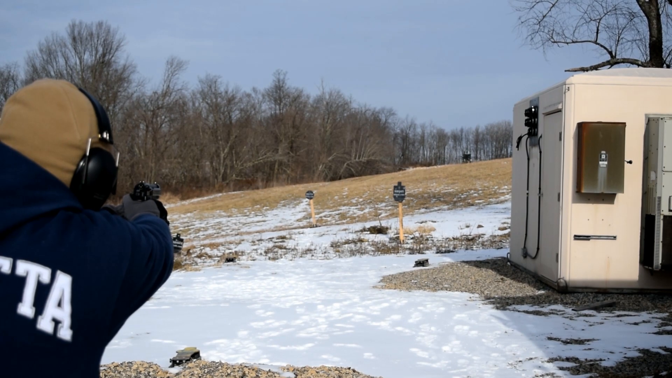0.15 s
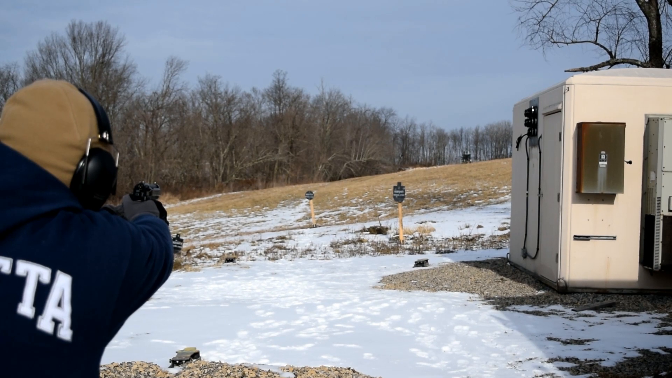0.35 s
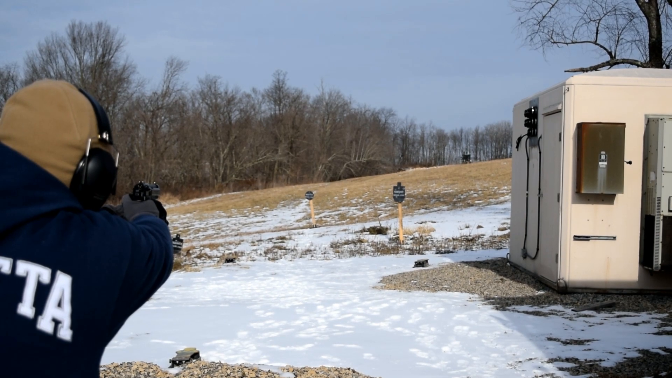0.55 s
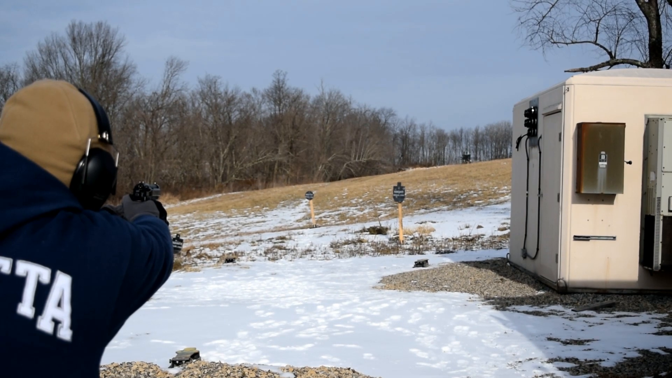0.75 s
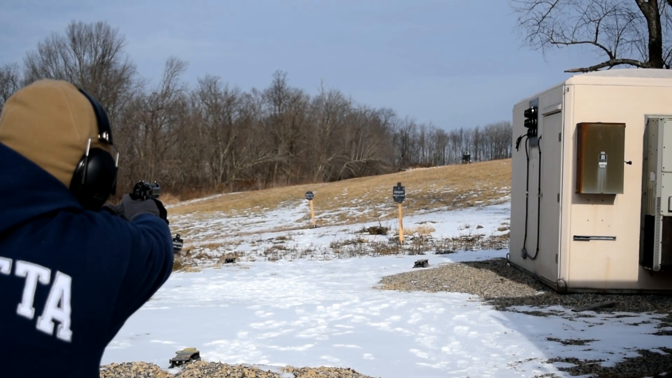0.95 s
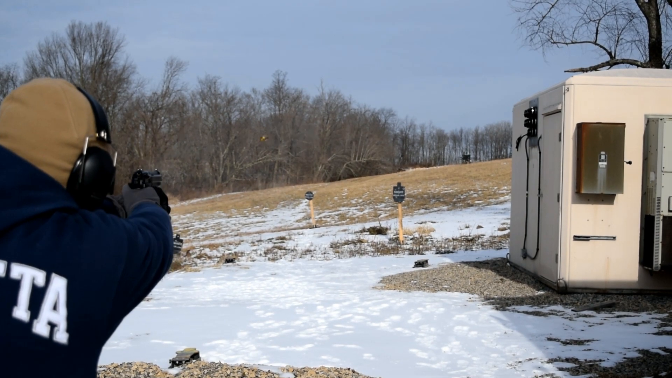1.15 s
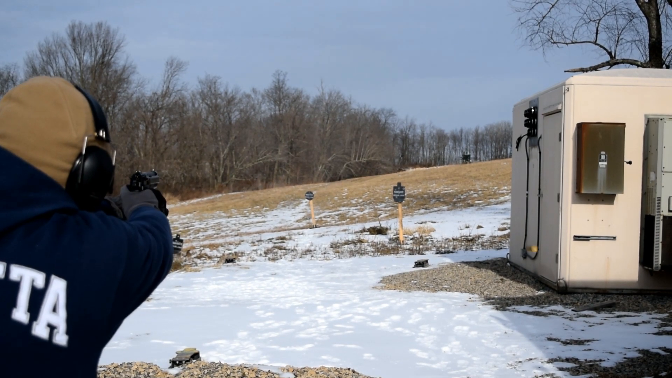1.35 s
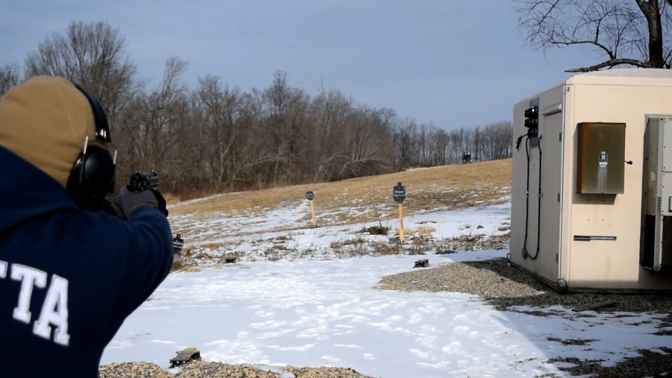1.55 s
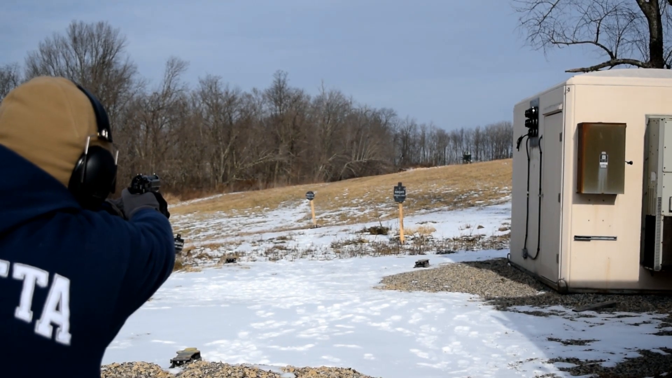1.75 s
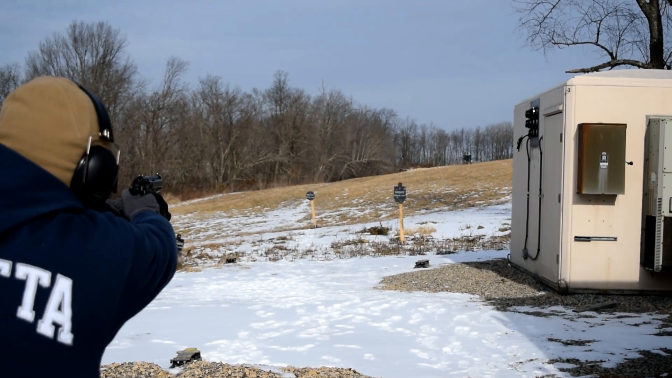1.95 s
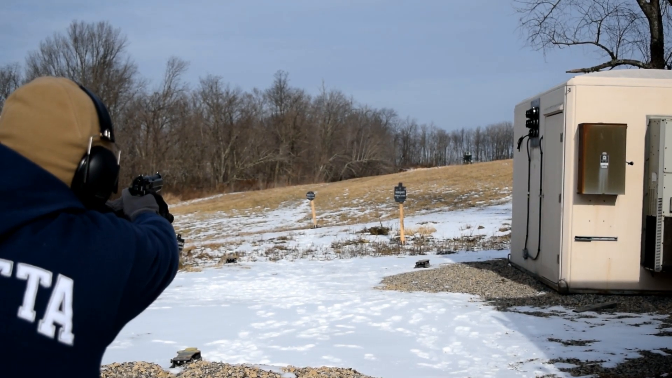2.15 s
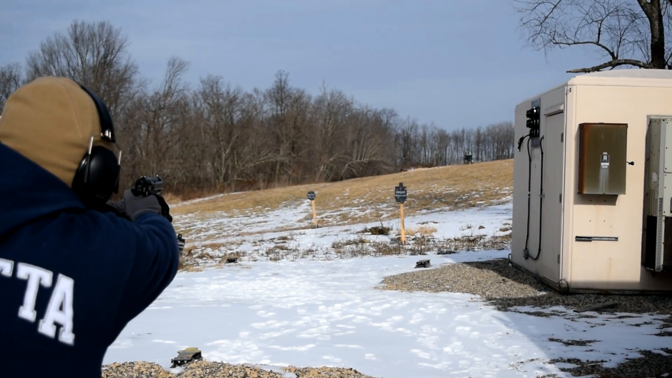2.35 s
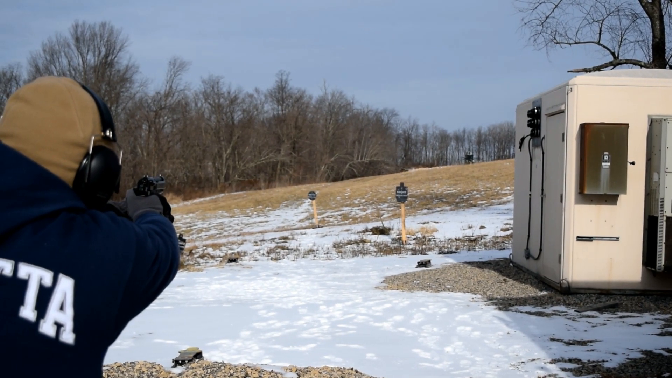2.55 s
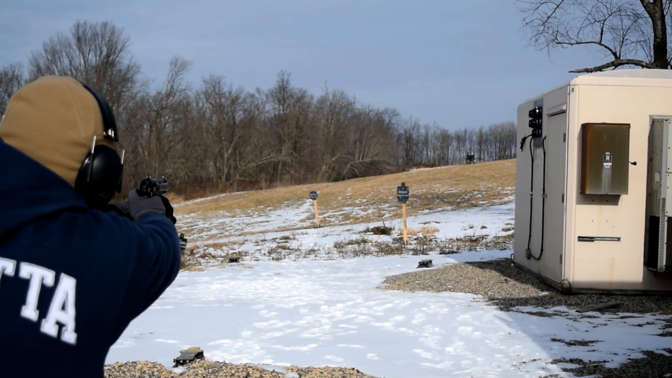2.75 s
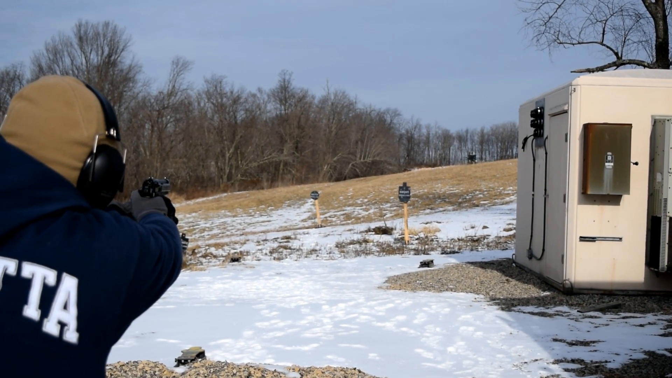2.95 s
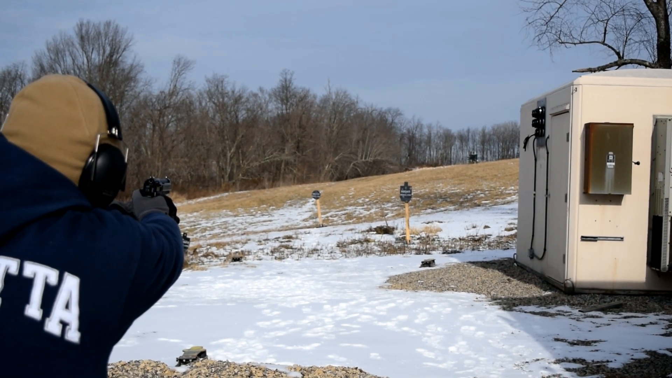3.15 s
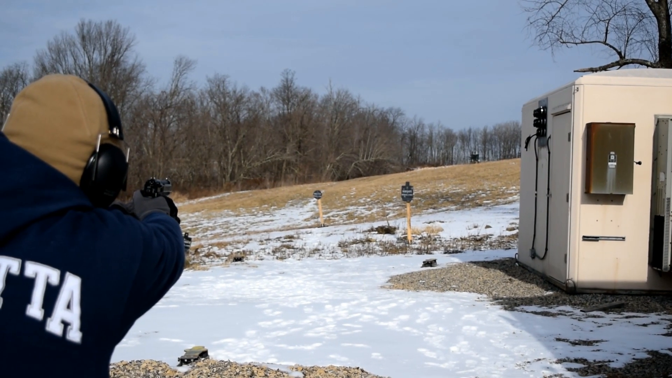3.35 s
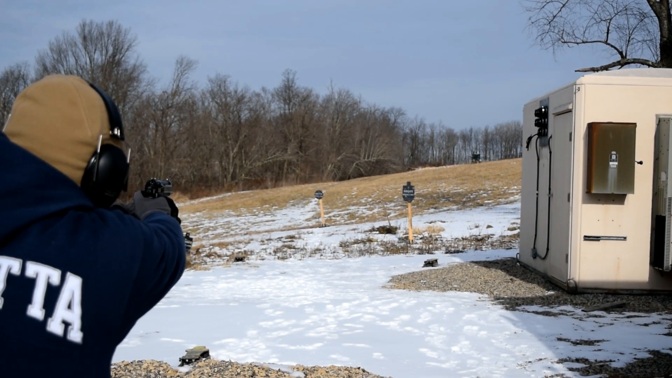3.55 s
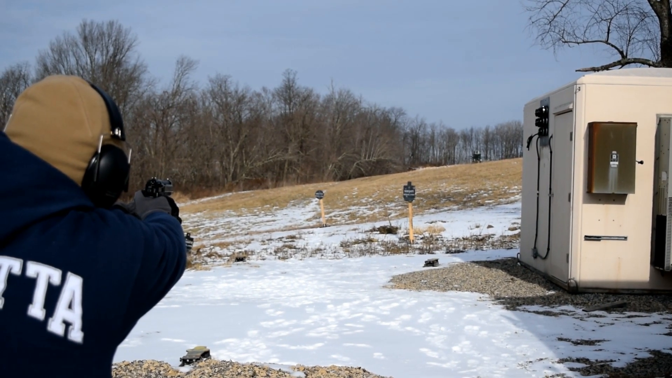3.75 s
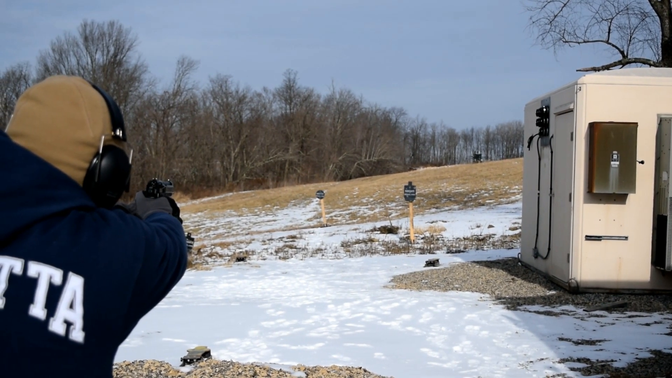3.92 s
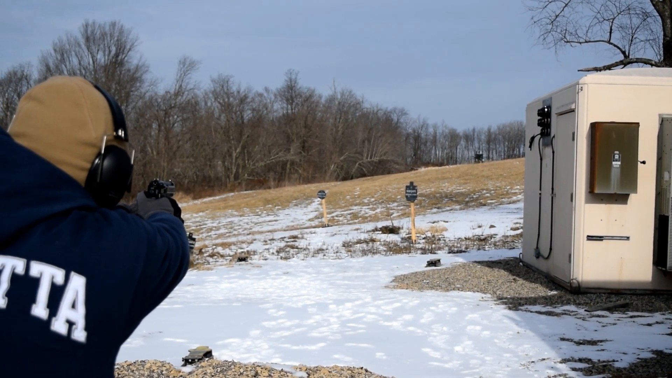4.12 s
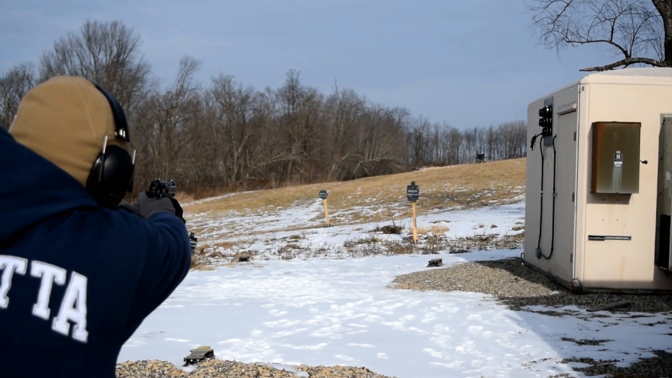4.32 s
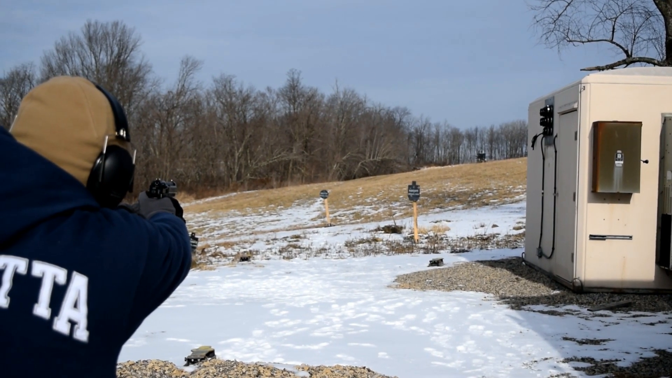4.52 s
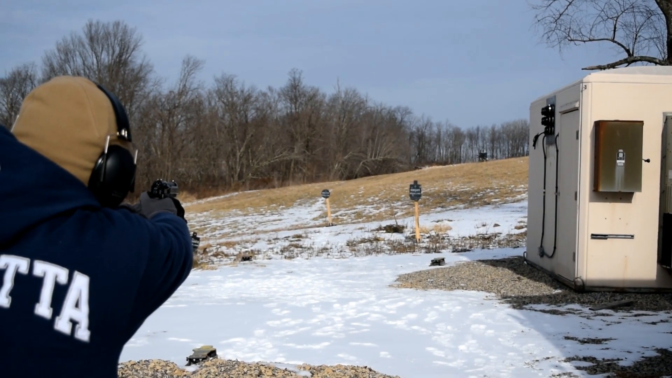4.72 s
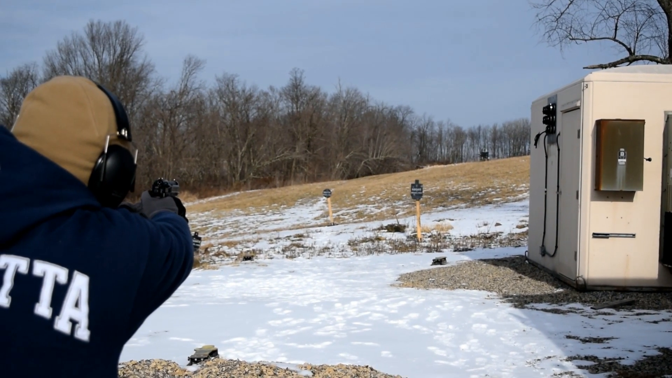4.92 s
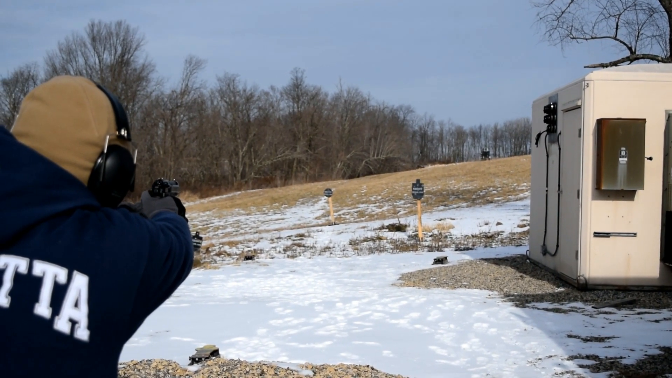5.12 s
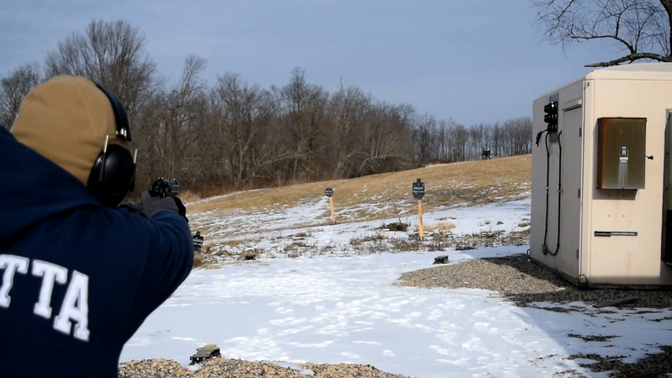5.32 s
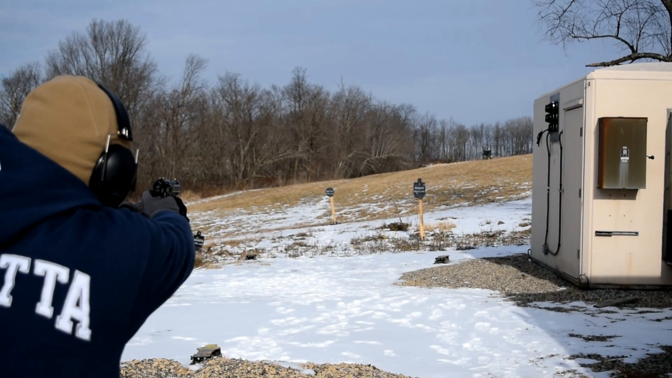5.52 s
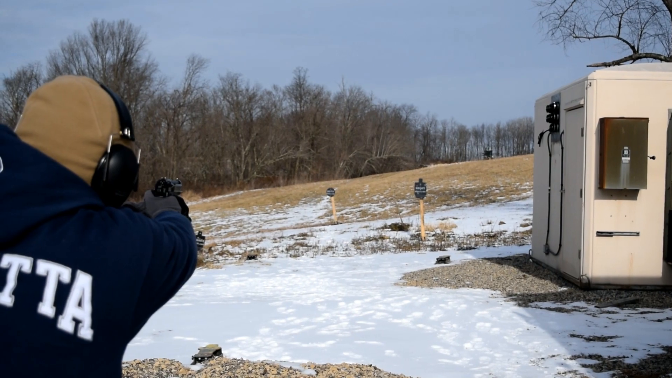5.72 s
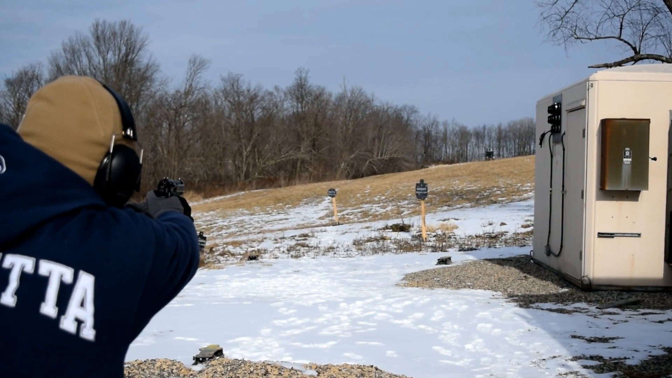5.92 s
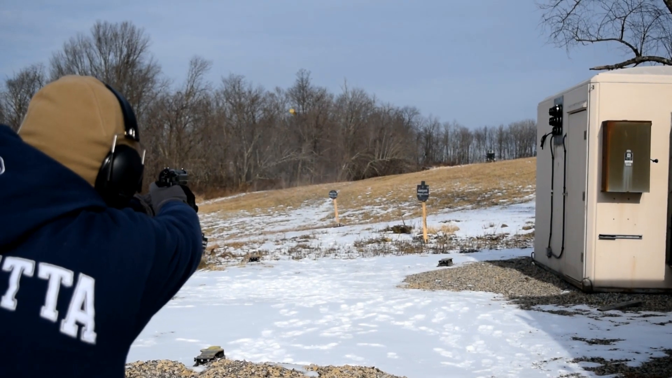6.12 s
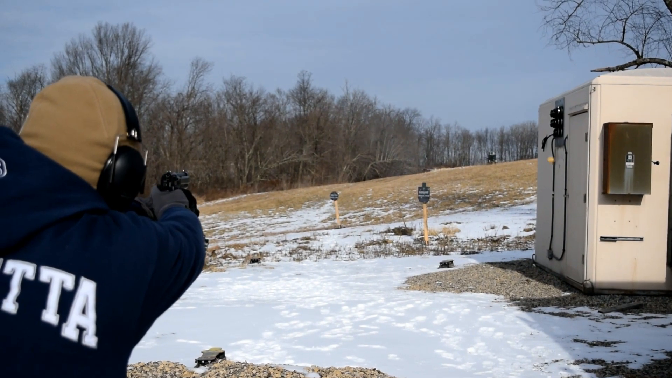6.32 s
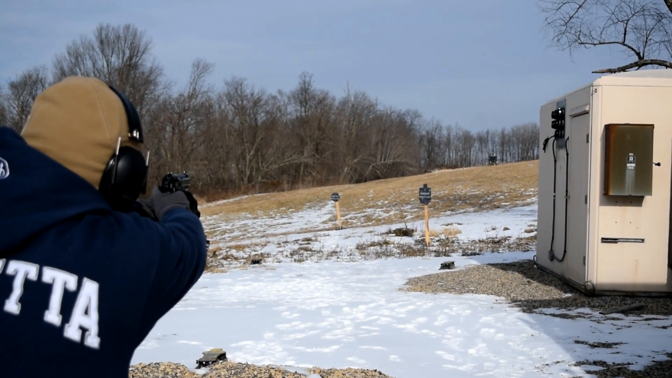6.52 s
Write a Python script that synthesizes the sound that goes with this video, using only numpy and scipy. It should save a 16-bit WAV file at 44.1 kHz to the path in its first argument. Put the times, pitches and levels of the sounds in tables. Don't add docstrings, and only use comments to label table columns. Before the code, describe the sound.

Two deafening pistol shots about five seconds apart on an open range, each overloading the microphone and rolling away through woods, with wind buffeting between.

```python
import sys
import numpy as np
from scipy import signal
from scipy.fft import rfft, irfft, next_fast_len
from scipy.io import wavfile
from scipy.ndimage import uniform_filter1d, map_coordinates

SR = 44100
rng = np.random.default_rng(int(sys.argv[2]) if len(sys.argv) > 2 else 0)


def level_to_linear(level):
    exponent = np.asarray(level, float) / 20
    return 10 ** exponent


def to_wav(sig):
    pcm = np.clip(np.atleast_2d(sig), -1, 1) * 32767
    pcm = np.round(pcm).astype(np.int16)
    wavfile.write(sys.argv[1], SR, pcm.T)


N = 294403

# start_s, strength_db, duck_depth (factor on the gain control's dip)
SHOTS = [
    (1.0989, -1.5, 1.04),
    (6.0673, -2.5, 1.15),
]
# pitch_hz, width_hz
CASE = [
    (790, 330),
    (2650, 830),
]
TREELINE_S = 0.342


def pistol():
    answer = slaps() + valley()
    out = np.zeros(N)
    for start_s, strength_db, _ in SHOTS:
        k = round(start_s * SR)
        out[k:] += level_to_linear(strength_db) * (blast() + answer)[:N - k]
        hammer = puffs([start_s - .0062], [strength_db - 15.5], [9], resonance(900, 1500), rise=0.1)
        out += hammer
    return out


def blast():
    # after_shot_s, level_db (before overload)
    ringing = [(0, 20), (.006, 13), (.013, 7), (.022, 3), (.028, -1), (.032, -6), (.037, -16), (.052, -25),
               (.07, -50)]
    (hz, width), (edge_hz, edge_width) = CASE
    t = np.arange(N) / SR
    wandering_hz = hz * np.exp(.21 * wobble(900))
    boom = np.sin(2 * np.pi * np.cumsum(wandering_hz) / SR) * level_to_linear(3 * wobble(300))
    heave = level_to_linear(-9) * unit(hissing(resonance(280, 550)))
    edge = level_to_linear(-7 - 330 * t) * unit(hissing(lambda f: resonance(edge_hz, 2.5 * edge_width)(f) ** 2))
    fizz = level_to_linear(-30 - 450 * t) * rng.standard_normal(N)
    front = level_to_linear(36 - 12000 * t) * hissing(resonance(4500, 9000))
    onset = np.minimum(t / 0.00067, 1)
    return level_to_linear(curves(ringing)[0]) * ((boom + heave) * onset + edge + fizz) + front


def slaps():
    # after_shot_s, boom_peak_db, crack_below_boom_db, pitch_hz, length_ms
    walls = [(.0563, 4, 24, 830, 6), (.0636, -9, 12, 1000, 3), (.0666, -5, 31, 1050, 7),
             (.0686, -10, 13, 1050, 2), (.0761, -10, 32, 800, 5), (.0821, -4, 17, 760, 6),
             (.1096, -5, 46, 920, 6), (.1267, 0, 12, 1150, 3.5), (.1294, -8, 21, 1300, 2.5),
             (.1441, -20, 20, 1100, 4), (.1556, -19, 18, 900, 4), (.1707, 3, 7, 1200, 2),
             (.1731, -7, 13, 1300, 2), (.1996, -15, 13, 1200, 5), (.2256, -14, 16, 950, 6),
             (.2466, -18, 17, 900, 6), (.2811, -15, 28, 880, 5)]
    # after_shot_s, crack_peak_db
    snaps = [(.3421, -32), (.3611, -35), (.3798, -33), (.4051, -35), (.4241, -31), (.4451, -42),
             (.4996, -43), (.8241, -35), (.9051, -55), (.9821, -35), (1.2801, -39)]
    edge_hz, edge_width = CASE[1]
    delay, boom_db, dull_db, hz, ms = np.transpose(walls)
    late, snap_db = np.transpose(snaps)
    age = late - TREELINE_S
    edge_db = np.append(boom_db - 0.4 * dull_db, -27 - 8 * age)
    crack_db = np.append(boom_db - dull_db, snap_db)
    boom_db = np.append(boom_db, -5.5 - 3.5 * age)
    delay = np.append(delay, late)
    hz = np.append(hz, 870 + 0 * late)
    ms = np.append(ms, 5 + 0 * late)

    def edge_colour(f):
        return resonance(edge_hz, edge_width)(f) * resonance(2200, 2500)(f) + 0.18 * resonance(4000, 1200)(f) ** 2

    def crack_colour(f):
        return resonance(4200, 9000)(f) * resonance(7000, 14000)(f)

    boom = cycles(np.transpose([delay, boom_db, hz, ms]))
    edge = puffs(delay - ms / 3000, edge_db + 3, 0.55 * ms, edge_colour, rise=0.82)
    crack = puffs(delay - ms / 5000, crack_db, .3 * ms, crack_colour, rise=.1)
    thud = puffs([.025, .055, .09, .17], [-12.5, -10.5, -19.5, -30], [41, 19, 35.4, 5.4],
                 lambda f: resonance(140, 260)(f) ** 2, rise=0.6)
    push = puffs([.03, .06, .17, .31], [-15.5, -28.5, -53, -45], [40, 48.5, 30.8, 60],
                 lambda f: resonance(55, 70)(f) ** 2, rise=0.086)
    return boom + edge + crack + thud + push


def valley():
    # freq_hz, level_db (per Hz)
    far_colour = [(160, -74), (280, -27), (353, -20), (599, -5), (839, -1.5), (1010, -3), (1360, -16.5),
                  (1530, -23.5), (1900, -31), (2470, -45), (4180, -120)]
    # freq_hz, level_db (per Hz)
    near_colour = [(300, -3.5), (450, -7.5), (650, -1), (1000, 3), (1400, -5.5), (1900, -31), (2600, -51)]
    # freq_hz, level_db (per Hz)
    leaves = [(1000, -15), (1600, -1), (2050, -7.5), (2600, -0.5), (2900, -11), (3300, -15), (4600, -18.5),
              (5400, -24), (8500, -29.5), (15000, -53)]
    # freq_hz, loss_db (per second of path)
    air = [(1000, 0), (2900, 0), (4000, 7), (7000, 18), (12000, 40)]
    t = np.arange(N) / SR
    walls, trees, roll, hill, bank = answer_levels()
    lumps = unit(level_to_linear(.5 * wobble(25) + 2 * wobble(110)))

    late = np.clip((t - 1.5) / 0.41, 0, 1)
    deep = noise(far_colour)
    deep = deep + late * 1.15 * filtered(deep, resonance(520, 250))
    boom = roll * lumps * deep + (walls + trees) * lumps * noise(near_colour)
    boom = boom + hill * lumps * unit(deep + 1.8 * filtered(deep, resonance(450, 320)))
    limited = boom / (1 + np.abs(boom / 0.82) ** 4) ** 0.24

    def bass_cut(f):
        return level_to_linear(np.clip(-30 * np.log2(330 / (f + 1)), -60, 0)) * (f < 2400)

    boom = filtered(limited, bass_cut)

    bright = level_to_linear(-11.5) * walls
    bright = bright + level_to_linear(-17.5) * trees ** 0.62 * np.clip((t - .16) / 0.12, 0, 1)
    bright = bright + level_to_linear(-20.5 - 5.5 * t) * roll
    hz, age, z = signal.stft(rng.standard_normal(N), SR, nperseg=256)
    colour_db = along(leaves, hz)[:, None] - along(air, hz)[:, None] * np.clip(age - .3, -.3, 1)
    edge = signal.istft(z * level_to_linear(colour_db), SR, nperseg=256)[1][:N]
    edge = edge / np.std(edge[SR // 2:SR])

    swell = bank * unit(hissing(lambda f: resonance(210, 200)(f) ** 2))
    return boom + swell + bright * lumps * edge


def answer_levels():
    # after_shot_s, height_db, half_width_s
    woods = [(.4, 3, .04), (.63, 0, .02), (.74, 3, .04), (.82, -2, .015), (.95, 2, 0.045), (1.29, 6, .03),
             (1.411, 7.5, 0.035), (1.5, 4.5, .04), (1.6, 2, .03), (1.761, 3.5, 0.016), (1.91, -3, 0.015),
             (2.2, -3.5, 0.022), (2.329, 5.5, .08)]
    t = np.arange(N) / SR
    walls_s, hill_s, bank_s = .045, 2, 0.305
    walls = (t > walls_s) * level_to_linear(-16.5 - 73.5 * (t - walls_s))
    trees = level_to_linear(-19 - 89.5 * np.abs(TREELINE_S - t)) * (t > walls_s)
    trees = trees * np.clip((TREELINE_S + 0.016 - t) / 0.029, 0, 1)
    roll_db = -11 - 2.5 * (t - TREELINE_S) - 14 * np.maximum(t - 0.89, 0) + humps(*np.transpose(woods))
    roll = np.clip((t - TREELINE_S + 0.01) / 0.005, 0, 1) * level_to_linear(roll_db)
    hill_db = -22.5 - 9 * ((t - hill_s) / np.where(t < hill_s, 0.038, 0.12)) ** 2
    bank_db = -25.5 - 9 * ((t - bank_s) / np.where(t < bank_s, 0.039, 0.056)) ** 2
    return walls, trees, roll, level_to_linear(hill_db), level_to_linear(bank_db)


def ticks():
    # start_s, peak_db, low_part_db (relative), length_ms
    sharp = [(1.8059, -29, -1.5, 2.9), (1.8115, -43, -5, 2.5), (1.83, -54, -3, 3), (1.8608, -43.5, 2, 3),
             (1.9857, -41.5, -5.5, 3.5), (3.078, -5.5, -7, 2.6), (3.085, -27, -9, 10),
             (3.0886, -17, -4, 6.7), (3.089, -31, -18, 55), (4.957, -52, 6, 6), (6.33, -27.5, 9, 6),
             (6.335, -29, 8, 6.7), (6.438, -44, 23, 1.6), (6.521, -43.5, 12, 2), (6.588, -50, 2, 2)]
    # centre_s, peak_db, pitch_hz, length_ms
    knocks = [(.244, -29.5, 920, 5.1), (2.862, -20, 1138, 3.3), (2.981, -19, 1020, 5.8),
              (3.0787, -31, 1180, 2.5), (3.555, -25, 657, 9.5), (4.959, -32, 900, 3), (4.96, -42, 1600, 4),
              (6.34, -6.5, 960, 3.1), (6.569, -20, 860, 9.1), (6.653, -9, 857, 11), (6.6752, -12, 800, 5),
              (3.308, -21, 780, 4.5)]
    s, peak_db, low_db, ms = np.transpose(sharp)
    high = puffs(s, peak_db, ms, lambda f: resonance(7600, 3000)(f) + 0.52 * resonance(12500, 6000)(f) ** 2)
    low = puffs(s, peak_db + low_db, ms,
                lambda f: resonance(2700, 900)(f) + 0.38 * resonance(4200, 2000)(f) ** 2)
    return high + low + cycles(knocks)


def wind():
    # time_s, strength_db
    slow = [(0, -42), (1.0, -38.5), (2.7, -38.5), (3.3, -38.5), (3.9, -34), (4.5, -39), (5.3, -34),
            (5.9, -37.5), (6.68, -50.5)]
    # centre_s, half_width_s, buffet_db, body_db, gaps_db
    gusts = [(.26, 0.052, 6, 3, 3), (.65, .03, 4.5, 3, 5.5), (2.08, .04, 4.5, 8.5, 2),
             (2.58, 0.04, 5, -4, -9.5), (2.76, 0.048, 0.5, 0, 6), (3.13, 0.059, 2, 2, 7),
             (3.49, 0.034, -1, 7, 20), (3.59, 0.044, -6, 10.5, 7), (3.81, 0.047, 1, 10, 5),
             (3.9, 0.026, 13.5, 9.5, 1), (4.08, 0.026, 1, 2.5, -6), (4.36, 0.045, 10.5, -1.5, -3),
             (4.64, 0.023, 4, 6.5, 11), (4.73, 0.04, 4, 9.5, 11), (4.97, .04, 3, 4, 3),
             (5.11, 0.024, 9.5, -1, 2), (5.23, 0.057, 3.5, 0.5, 0), (5.55, 0.05, 4, -1, 2.5),
             (5.67, 0.04, -1, 6, 8.5), (6.0, 0.042, -6, -2, 1)]
    # freq_hz, level_db (per Hz)
    buffet_colour = [(12, -33.5), (20, -4.5), (38, -1.5), (70, 2.5), (171, -12.5), (200, -13), (260, -49),
                     (440, -120)]
    body_colour = [(76, -31.5), (130, -2), (172, -2.5), (236, -0.5), (302, -0.5), (333, -3.5), (450, -9.5),
                   (580, -36.5), (990, -120)]
    gaps_colour = [(240, -23.5), (400, -7.5), (466, -7.5), (531, -4.5), (669, -6), (727, -5.5), (835, -11),
                   (959, -4.5), (1050, -11.5), (1410, -21.5), (2500, -30.5), (3250, -68.5), (5500, -120)]
    # pitch_hz, width_hz, level_db
    slots = [(234, 24, 6.5), (529, 120, 7.5), (784, 35, 2.5), (947, 44, 2)]
    strength_db, = curves(slow)
    s, half_width, *push_db = np.transpose(gusts)
    shake_db, drum_db, rush_db = (humps(s, db, half_width) for db in push_db)
    gust, flutter = wobble(24), wobble(6.4)
    buffet = level_to_linear(strength_db + shake_db + 1.3 * flutter) * unit(level_to_linear(1.0 * gust) * noise(buffet_colour))

    body_db = -40.5 + 0.12 * (strength_db - strength_db.mean()) + drum_db + 0.9 * wobble(9)
    body = level_to_linear(body_db) * unit(level_to_linear(0.63 * gust + 1.5 * wobble(40)) * noise(body_colour))

    calm = level_to_linear(-44)
    rush = calm * level_to_linear(rush_db + 1.4 * wobble(9.5))
    song = unit(hissing(lambda f: sum(level_to_linear(db) * resonance(hz, width)(f) ** 2 for hz, width, db in slots)))
    gaps = np.sqrt(rush * calm) * noise(gaps_colour)
    gaps = gaps + level_to_linear(-9.5) * np.minimum(rush ** 2 / calm, 4 * calm) * song

    gain_db = duck_db()
    return level_to_linear(np.maximum(1.6 * gain_db, -17)) * buffet + level_to_linear(.55 * gain_db) * (body + gaps)


def bird():
    # time_s, pitch_hz, level_db
    whistles = [
        [(4.13, 2640, -72), (4.155, 2610, -54), (4.19, 2450, -53), (4.22, 2240, -59), (4.255, 2040, -55),
         (4.28, 1960, -72)],
        [(4.41, 2810, -66), (4.44, 2600, -54), (4.47, 2280, -61), (4.51, 2080, -52), (4.54, 2200, -62),
         (4.57, 2030, -62), (4.6, 1970, -70)],
    ]
    out = np.zeros(N)
    for whistle in whistles:
        hz, db = curves(whistle)
        level = level_to_linear(db + 1.5 + 2.4 * wobble(80))
        out += level * np.sin(2 * np.pi * np.cumsum(hz * (1 + 0.017 * wobble(90))) / SR)
    return out


def duck_db():
    # after_shot_s, gain_db
    dip = [(0, 1), (.02, -3), (.38, -5.5), (.55, -16.5), (1.001, -13.5), (1.2, -9.5), (1.4, -3), (1.6, 0)]
    s, db = np.transpose(dip)
    t = np.arange(N) / SR
    return sum(depth * np.interp(t - at, s, db, left=0, right=0) for at, _, depth in SHOTS)


def unit(x):
    return x / np.sqrt(np.mean(x ** 2) + 1e-20)


def along(points, hz):
    f, v = np.transpose(points)
    return np.interp(np.log(hz + 1), np.log(f + 1), v)


def curves(rows):
    s, *cols = np.transpose(rows)
    return [np.interp(np.arange(N) / SR, s, c, left=-120, right=-120) for c in cols]


def wobble(rate):
    knots = rng.standard_normal(int(N * rate / SR) + 4)
    return map_coordinates(knots, [np.arange(N) * rate / SR])


def humps(times, height_db, half_width):
    t = np.arange(N) / SR
    return sum(db * np.exp(-((t - s) / w) ** 2) for s, db, w in zip(times, height_db, half_width))


def filtered(x, response):
    m = next_fast_len(len(x) + 8192)
    return irfft(rfft(x, m) * response(np.fft.rfftfreq(m, 1 / SR)), m)[:len(x)]


def resonance(hz, width_hz):
    return lambda f: 1j * f * width_hz / (hz * hz - f * f + 1j * f * width_hz + 1e-9)


def hissing(response):
    return filtered(rng.standard_normal(N), response)


def noise(spectrum):
    return unit(hissing(lambda hz: level_to_linear(along(spectrum, hz))))


def puffs(times, peak_db, length_ms, response, rise=0.0):
    out = np.zeros(N + SR)
    t = np.arange(SR // 20) / SR
    for s, db, ms in zip(times, peak_db, length_ms):
        u = 1000 * t / np.abs(ms)
        envelope = level_to_linear(-20 * u) * np.minimum(u / (abs(rise) + 1e-9), 1)
        burst = filtered(rng.standard_normal(len(t)) * envelope, response)
        out[round(s * SR):][:len(t)] += level_to_linear(db) * burst / np.abs(burst).max()
    return out[:N]


def cycles(rows):
    out = np.zeros(N + SR)
    t = np.arange(-SR // 50, SR // 50) / SR
    rise_share = 0.46
    for (s, db, hz, ms), (phase, bend) in zip(rows, rng.uniform(-2.24, 1, (len(rows), 2))):
        u = 2000 * t / ms / np.where(t < 0, rise_share, 2 - rise_share)
        wave = np.sin(2 * np.pi * hz * t + np.pi * phase + .8 * bend * u * u)
        out[round((s + t[0]) * SR):][:len(t)] += level_to_linear(db - 7 * np.abs(u) ** 3) * wave
    return out[:N]


def scene():
    return (pistol() + ticks() + wind() + bird())[None]


def top_cut(x):
    return signal.sosfilt(signal.butter(12, 16390, fs=SR, output="sos"), x)


def record(dry):
    # freq_hz, level_db (per Hz)
    preamp = [(880, -34.5), (1500, 3), (1620, -6), (1980, -3.5), (2290, -1.5), (14200, -4), (15800, -4)]
    x = dry[0] + level_to_linear(-54 + duck_db() + 3) * noise(preamp)
    x = x / (1 + np.abs(x / .9) ** 5) ** .2
    sag = x - filtered(x, lambda f: 1j * f / (130 + 1j * f))
    driven = np.clip(uniform_filter1d(np.abs(x), size=441) / .6, 0, 1)
    x = x - sag * driven
    x = filtered(np.clip(x, -1, 1), lambda f: level_to_linear(-np.clip((f - 15500) / 60, 0, 14)))
    return top_cut(x[None])


dry = scene()
out = record(dry)
to_wav(out)
```